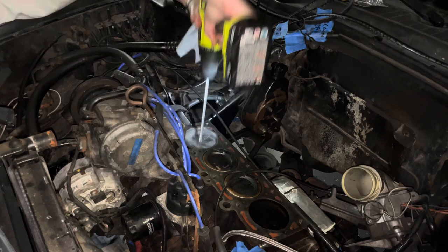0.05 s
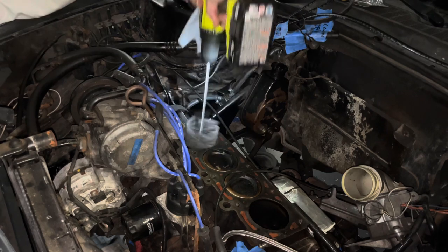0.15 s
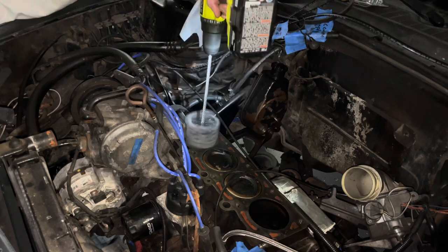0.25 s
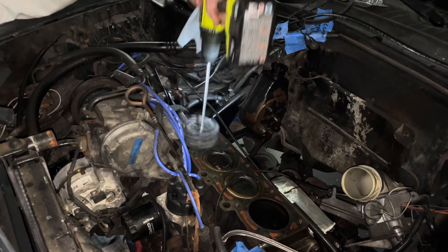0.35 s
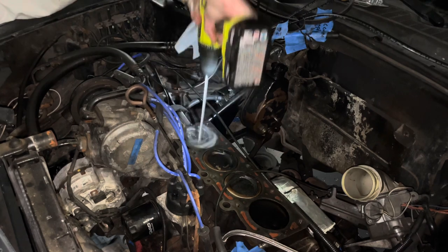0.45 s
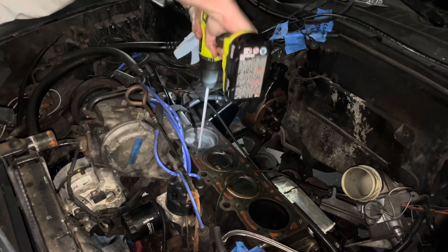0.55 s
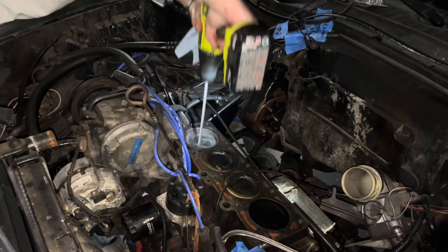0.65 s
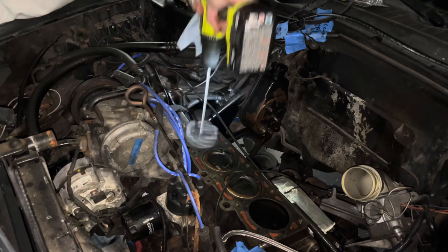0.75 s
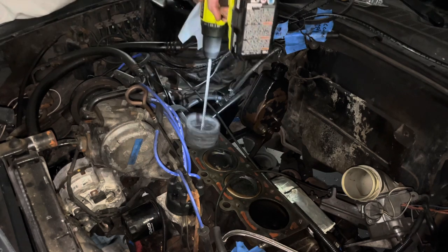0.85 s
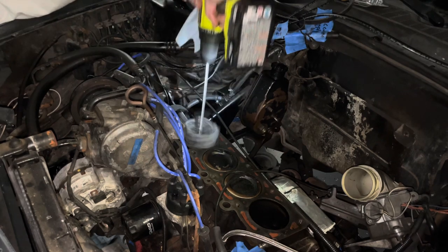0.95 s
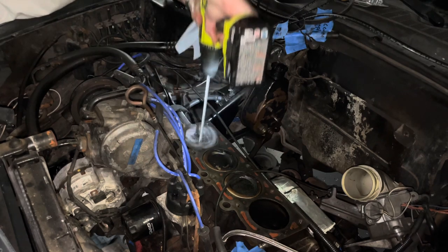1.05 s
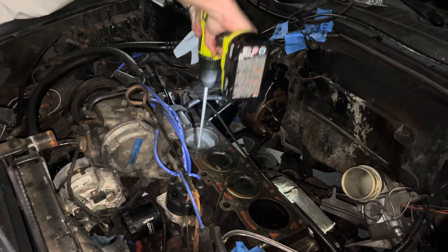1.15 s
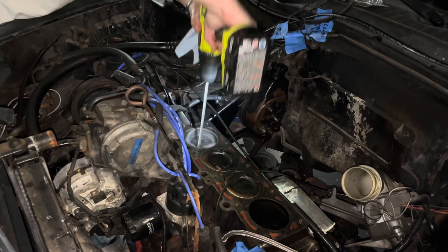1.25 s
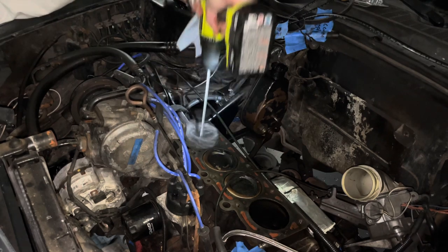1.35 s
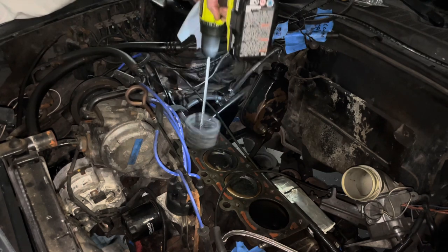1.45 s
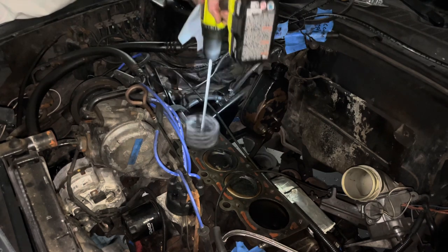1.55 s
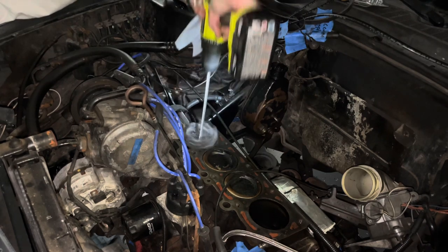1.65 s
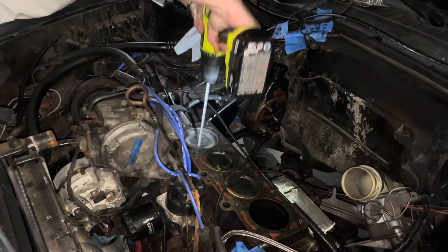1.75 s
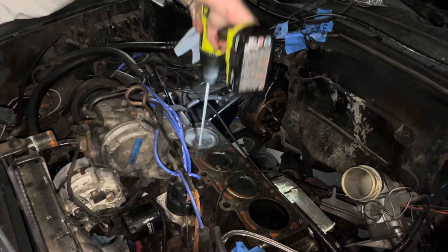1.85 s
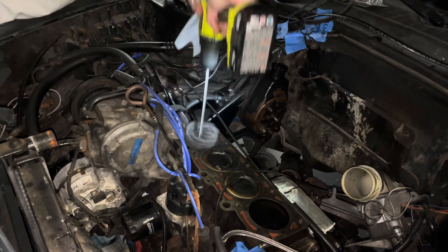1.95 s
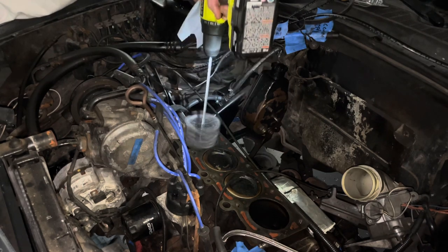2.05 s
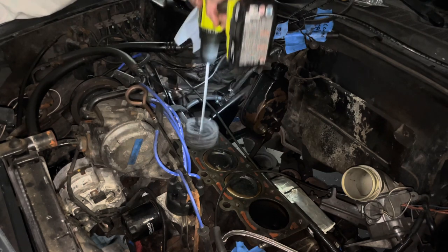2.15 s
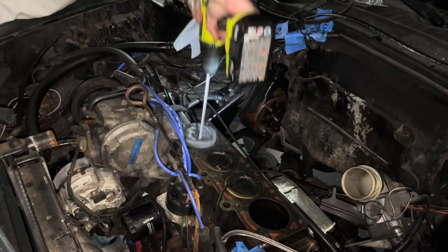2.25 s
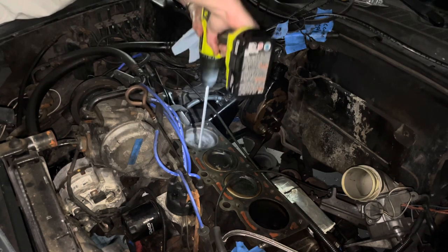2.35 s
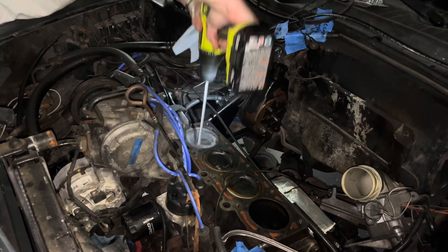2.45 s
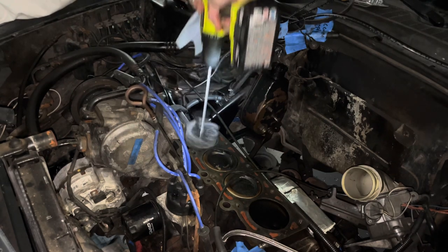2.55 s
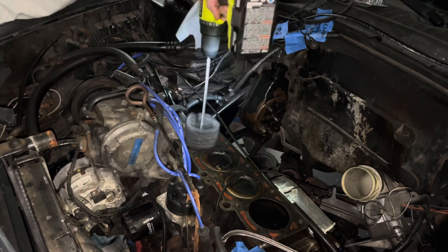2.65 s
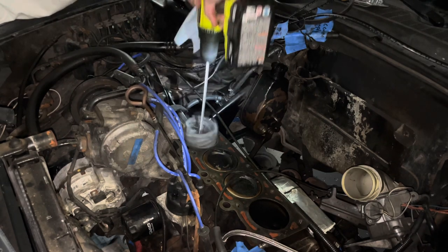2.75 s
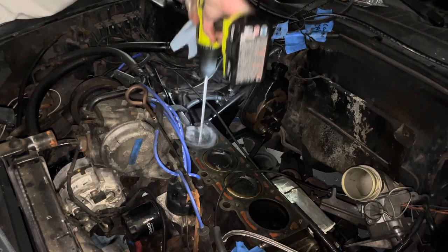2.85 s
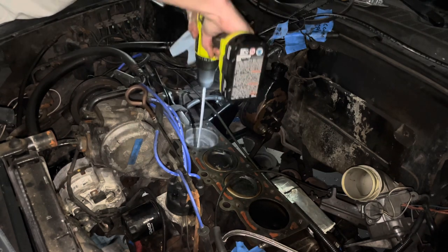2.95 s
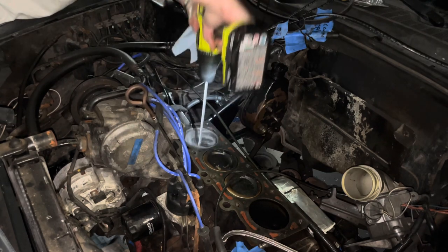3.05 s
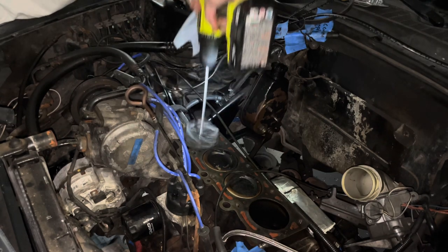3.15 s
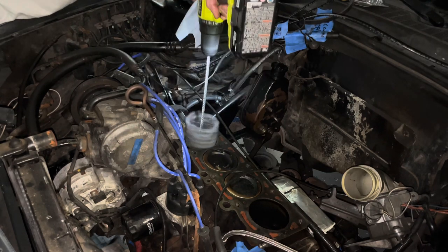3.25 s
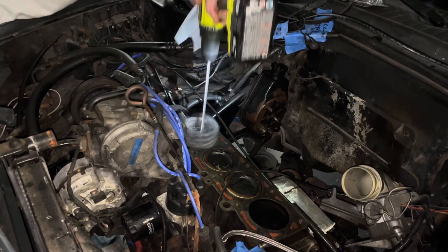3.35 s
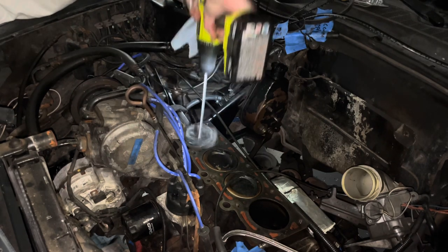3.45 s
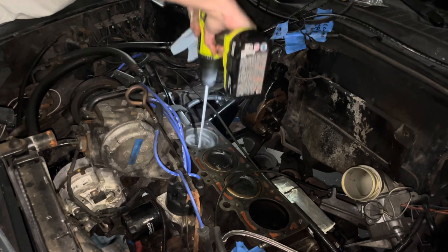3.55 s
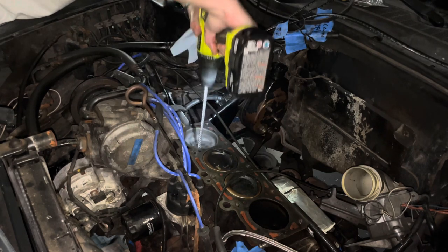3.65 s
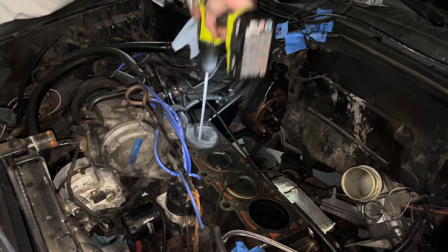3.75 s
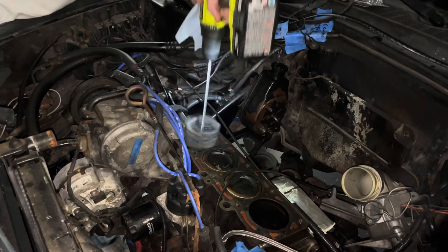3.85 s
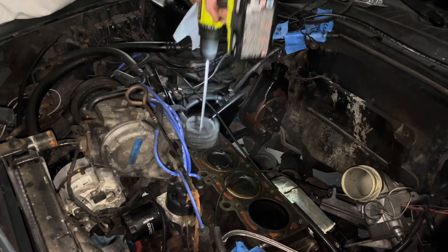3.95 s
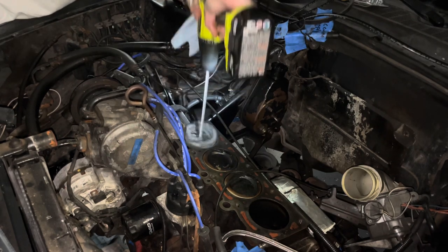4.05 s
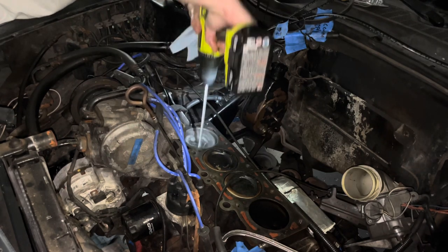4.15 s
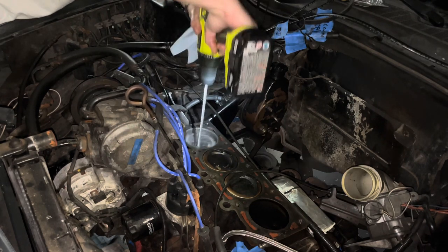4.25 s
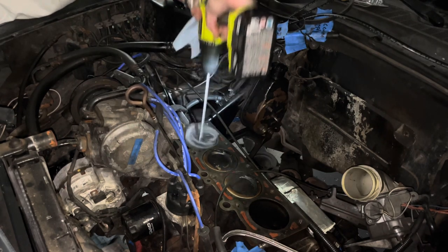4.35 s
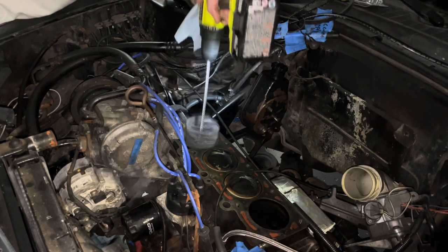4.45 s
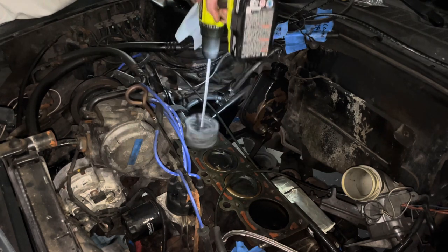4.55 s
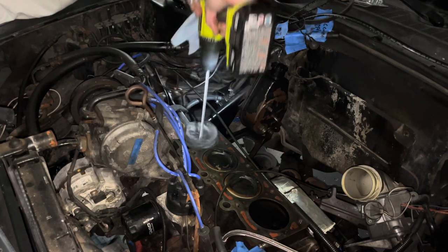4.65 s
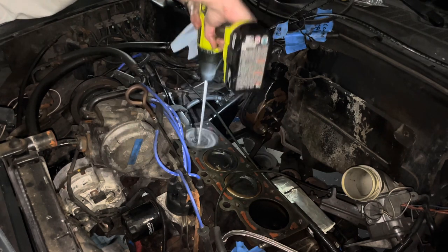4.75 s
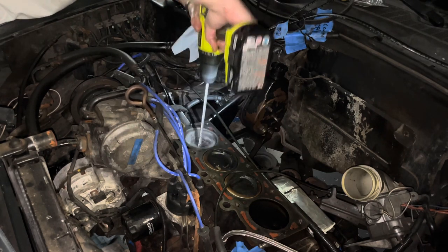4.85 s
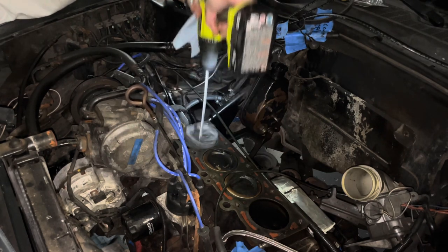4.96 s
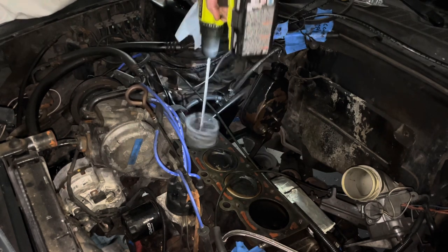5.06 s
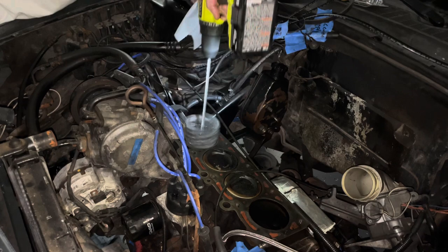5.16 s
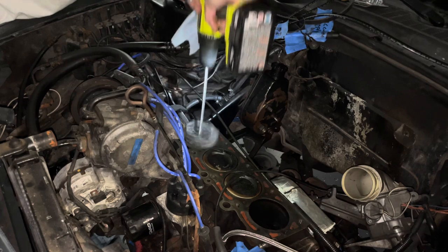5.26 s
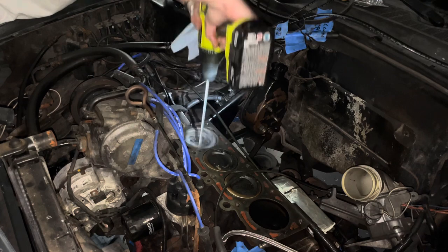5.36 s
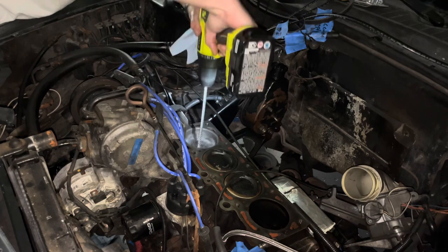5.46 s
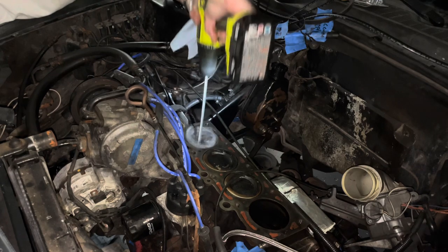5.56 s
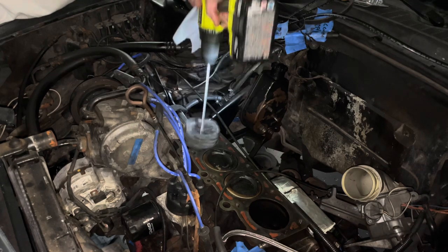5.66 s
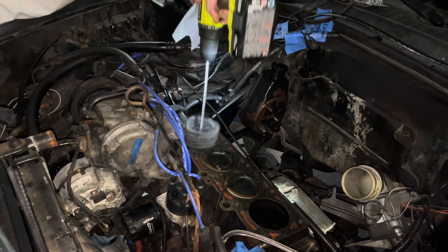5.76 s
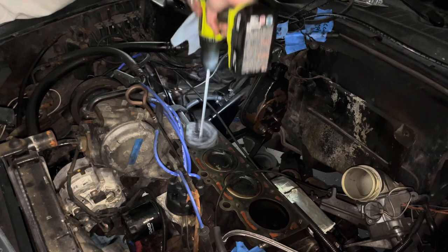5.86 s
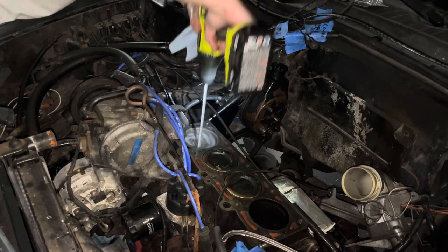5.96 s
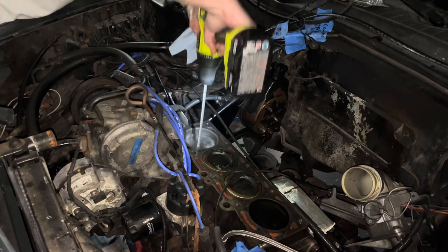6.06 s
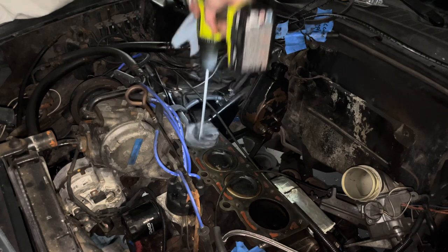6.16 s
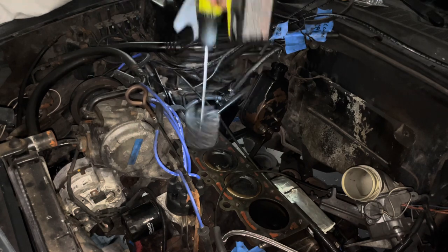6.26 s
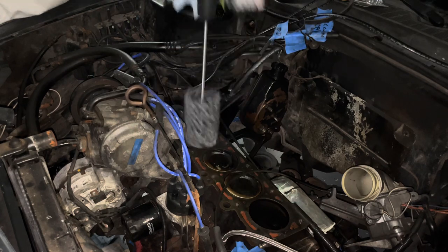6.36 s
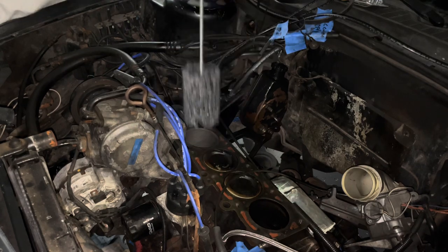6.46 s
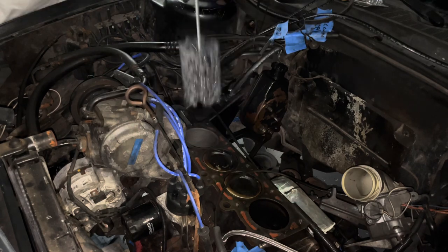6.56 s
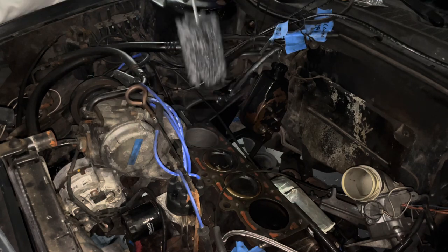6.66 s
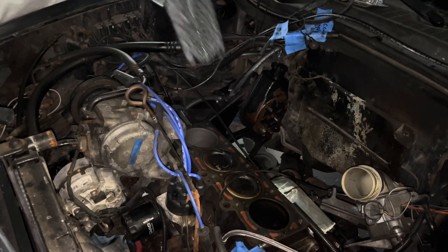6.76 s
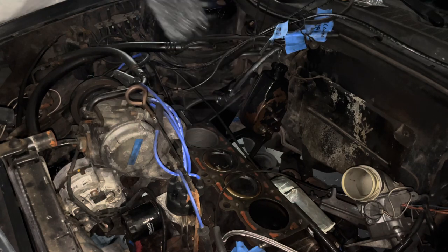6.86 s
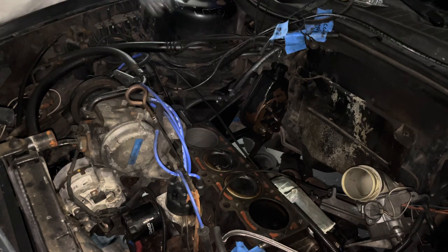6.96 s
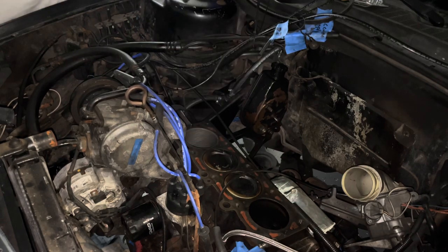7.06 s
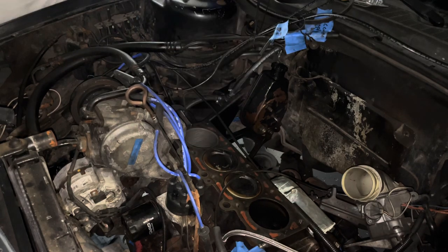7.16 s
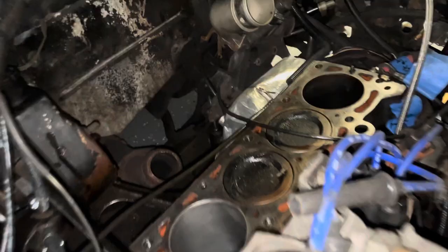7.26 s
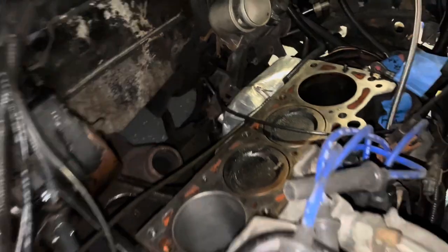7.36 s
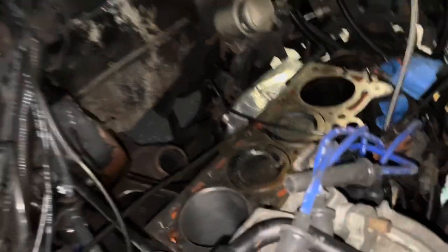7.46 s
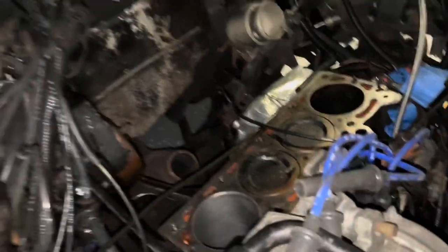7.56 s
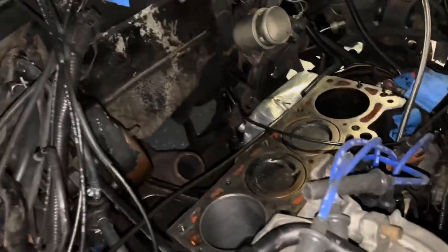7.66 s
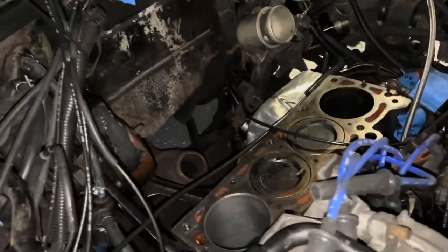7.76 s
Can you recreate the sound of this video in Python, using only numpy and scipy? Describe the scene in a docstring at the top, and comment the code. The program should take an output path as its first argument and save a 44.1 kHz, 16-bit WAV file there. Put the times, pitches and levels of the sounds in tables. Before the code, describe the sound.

Close, wide stereo sound in a garage. Harsh, airy scraping of abrasive on iron dominates, with bright grit hiss above and a high electric drill whine bending up and down on each stroke. Around 6.2 seconds a quick flurry of ticks and knocks marks the hone leaving the bore, and the tool noise cuts off. Then only low hum, room rumble, small hollow knocks and dull thuds, dipping nearly to silence before faint room tone.

```python
"""A cordless drill strokes a ball hone along an engine bore in a garage, then the hone comes out and stops.
Shaped noise, throbbing with the shaft, gives scrape and grit sizzle; sines on shaft multiples give gear whine.
Damped 13 kHz bursts are balls flicking the rim; decaying tones and noise cracks are knocks and thuds.
Behind lie a wavering hum and three bands of room noise; the level dips briefly almost to silence near the end."""
import sys
import numpy as np
from scipy import signal
from scipy.fft import rfft, irfft, next_fast_len
from scipy.io import wavfile
from scipy.ndimage import uniform_filter1d, map_coordinates

SR = 44100
rng = np.random.default_rng(int(sys.argv[2]) if len(sys.argv) > 2 else 0)


def wav_record(signal):
    """Record a signal, one row per channel, as 16-bit PCM in the file named by sys.argv[1]."""
    frames = np.transpose(np.atleast_2d(signal))
    bounded = np.clip(frames, -1, 1)
    # unit amplitude maps onto the largest positive 16-bit level
    quanta = np.round(bounded * 32767).astype(np.int16)
    wavfile.write(sys.argv[1], SR, quanta)


N = 344994

# Room noise, rumble, mid drone and hiss: start_s, rumble_db, drone_db, hiss_db
ROOM_TONE = [(0, -56.5, -57, -71), (3, -54.5, -58, -62), (6.3, -55, -56.5, -69), (6.6, -51.5, -58, -67),
             (6.77, -54, -57.5, -73), (6.9, -54, -56, -67.5), (7.05, -48, -55.5, -70),
             (7.12, -56, -59, -73.5), (7.16, -56, -60, -76), (7.2, -45, -58, -78), (7.27, -52, -60, -77),
             (7.35, -54, -63, -76.5), (7.5, -55.5, -64, -72.5), (7.619, -50.5, -64.5, -79.5),
             (7.75, -52, -60, -70), (7.82, -55, -60, -72)]
# Relative noise spectra of the three bands: frequency_hz, density_db (per Hz)
RUMBLE_SPECTRUM = [(18, -16), (35, -4), (58, -7), (75, 4), (95, 4), (115, 2), (145, -3.5), (185, 0),
                   (230, -7), (300, -18.5)]
DRONE_SPECTRUM = [(200, -16), (280, 1.5), (400, 3.5), (560, -3.5), (700, -3.5), (950, -4.5), (1250, -8),
                  (1600, -18), (2000, -36)]
HISS_SPECTRUM = [(1300, -19.5), (1700, -6), (2300, -12), (3300, -15), (4300, -17), (5900, -19), (7500, -22),
                 (10000, -24), (14500, -19), (15700, -41)]
# Narrow bands that stand out of the hiss: centre_hz, width_hz, rise_db
HISS_RESONANCES = [(5200, 300, 7), (6700, 150, 4), (2350, 150, 3)]
# Hum before its random waver: start_s, level_db
HUM_LEVEL = [(0.0, -41), (0.78, -38.5), (0.92, -43), (1.35, -40.5), (1.44, -45), (1.53, -40), (1.82, -36),
             (1.98, -41), (2.14, -38), (2.35, -39), (2.55, -47), (2.62, -41), (2.89, -39.5), (3.05, -44),
             (3.12, -40), (3.4, -37.5), (3.55, -41.5), (3.97, -39.5), (4.05, -46.5), (4.4, -36),
             (4.61, -40.5), (4.89, -37.5), (5.07, -39.5), (5.15, -46), (5.23, -41), (5.48, -40),
             (5.64, -43.5), (6.01, -37), (6.17, -42), (6.31, -38), (6.39, -41), (6.58, -38), (6.64, -40.5),
             (6.75, -54.5), (6.83, -42.5), (6.95, -38.5), (7.09, -36), (7.25, -40.5), (7.28, -37),
             (7.31, -50.5), (7.44, -47), (7.69, -53), (7.77, -63), (7.8, -58)]
# Dull low bumps after the drill stops: start_s, level_db, pitch_hz
THUDS = [(6.588, -46, 91.5), (6.891, -40, 102), (6.996, -41, 109), (7.118, -34, 99.6), (7.536, -53, 110),
         (7.662, -51, 96.7)]
# Light knocks as the hone slips out and later: start_s, ring_db, crack_db (before mode and filter gains)
KNOCKS = [(6.144, -40, -50), (6.203, -38, -46), (6.255, -38, -50), (6.275, -38, -48), (6.314, -43, -48),
          (6.349, -41, -42), (6.385, -47, -52), (6.471, -49, -62), (6.837, -45, -62), (6.858, -50, -50),
          (6.875, -49, -62), (6.894, -50, -62), (6.945, -46.5, -59), (7.001, -46, -62), (7.049, -47, -63),
          (7.098, -48.5, -65), (7.186, -52, -66)]
# Damped modes of a knock: pitch_hz, relative_db, t60_s
KNOCK_MODES = [(560, 2.5, 0.063), (885, -6, 0.066)]
# Balls flicking the rim, mostly as the hone leaves: start_s, envelope_peak_db
RIM_FLICKS = [(0.0912, -21), (0.3581, -17), (1.3389, -18), (2.8853, -19), (6.158, -20), (6.1985, -17),
              (6.2195, -14), (6.227, -15), (6.2455, -16), (6.2955, -19), (6.3058, -19), (6.3078, -12),
              (6.3425, -19), (6.3615, -16), (6.365, -15), (6.3775, -15), (6.385, -19)]
# Hone on iron, before flares and random swells: start_s, scrape_db, sizzle_db
HONE_LEVEL = [(0.0, -31, -37), (1.5, -31, -35.5), (3.0, -30.5, -35.5), (4.0, -30.5, -35.5),
              (5.0, -30.5, -35.5), (6.13, -30.5, -35.5), (6.226, -29, -28), (6.29, -30.5, -35),
              (6.388, -33.5, -27), (6.43, -34, -36)]
# Relative scrape spectra, mid and side: frequency_hz, density_db (per Hz)
SCRAPE_MID = [(130, -35.5), (220, -19.5), (319, -21), (521, -10), (633, -13), (918, -5.5), (1100, -6),
              (1240, -10), (1380, -7), (1520, -6.5), (1660, -9.5), (2310, -5.5), (3770, -0.5), (4700, -2.5),
              (5200, -5), (6000, -7), (7260, -7), (7700, -15.5), (10000, -88.5), (16900, -120)]
SCRAPE_SIDE = [(130, -59), (220, -23), (360, -29.5), (422, -20.5), (488, -15), (936, -7), (1250, -12.5),
               (1770, -10.5), (3700, 1.5), (4800, -4.5), (7000, -5.5), (9100, -37.5), (15400, -120)]
# Relative grit spectra, mid and side; the side is stronger around 8-9.5 kHz: frequency_hz, density_db (per Hz)
SIZZLE_MID = [(8900, -28.5), (9700, -3), (10500, -2.5), (12500, -2), (13400, 0), (14500, -1.5), (15700, -8)]
SIZZLE_SIDE = [(6600, -22.5), (7400, -4.5), (9500, -5), (11600, -12.5), (11900, -16), (12500, -21)]
# Resonances of the air and iron of the bore: centre_hz, width_hz, rise_db
BORE_RESONANCES = [(960, 220, 1), (1593, 430, 2), (3860, 410, -0.5)]
# Brief flares of the sizzle: centre_s, rise_db
SIZZLE_FLARES = [(0.05, 3), (0.37, 2.5), (0.71, 3), (1.34, 2.5), (3.18, 2), (3.74, 2), (4.4, 2.5),
                 (6.1, 0.5)]
# Gear mesh pitch; the motor slows under load, overshoots and sags each stroke: start_s, pitch_hz
MESH_PITCH = [(0.0, 1858), (0.06, 1851), (0.11, 1877), (0.24, 1991), (0.27, 2008), (0.32, 1974),
              (0.38, 1945), (0.45, 1927), (0.52, 1911), (0.56, 1875), (0.61, 1850), (0.69, 1835),
              (0.75, 1879), (0.8, 1942), (0.83, 1954), (0.89, 1957), (1.06, 1928), (1.11, 1932),
              (1.19, 1892), (1.3, 1861), (1.34, 1870), (1.47, 1972), (1.52, 1992), (1.55, 1985),
              (1.66, 1925), (1.77, 1926), (1.83, 1873), (1.9, 1858), (1.95, 1886), (2.06, 1986),
              (2.12, 1993), (2.22, 1927), (2.37, 1930), (2.4, 1912), (2.45, 1876), (2.51, 1858),
              (2.55, 1869), (2.62, 1945), (2.67, 1943), (2.72, 1963), (2.82, 1958), (3.1, 1858),
              (3.13, 1855), (3.19, 1880), (3.26, 1946), (3.33, 1993), (3.5, 1910), (3.58, 1914),
              (3.62, 1874), (3.71, 1841), (3.77, 1846), (3.81, 1886), (3.87, 1948), (3.93, 1957),
              (4.11, 1932), (4.17, 1938), (4.25, 1880), (4.34, 1873), (4.41, 1882), (4.51, 1959),
              (4.57, 1967), (4.61, 1975), (4.65, 1965), (4.73, 1924), (4.85, 1903), (4.97, 1866),
              (4.99, 1856), (5.11, 1967), (5.15, 1986), (5.25, 1947), (5.31, 1920), (5.41, 1925),
              (5.47, 1882), (5.54, 1862), (5.59, 1867), (5.62, 1870), (5.65, 1911), (5.72, 1943),
              (5.96, 1931), (5.99, 1920), (6.05, 1878), (6.17, 1863), (6.19, 1860), (6.27, 1945),
              (6.36, 1938)]
# Main gear tones before random swells (mesh, octave, one shaft multiple below it, low motor tone):
# start_s, level_db
MESH_LEVEL = [(0.0, -38.5), (0.03, -39.5), (0.2, -37), (0.31, -51), (0.35, -38.5), (0.44, -52.5),
              (0.48, -37.5), (0.51, -52.5), (0.56, -36), (0.68, -46.5), (0.85, -36), (0.98, -39),
              (1.08, -58.5), (1.12, -56.5), (1.15, -40.5), (1.2, -33.5), (1.3, -42), (1.36, -34.5),
              (1.41, -44), (1.45, -36.0), (1.55, -52.5), (1.58, -38.5), (1.62, -37.5), (1.66, -57.5),
              (1.76, -49.5), (1.81, -37.5), (1.89, -43.5), (1.92, -40), (2.04, -36), (2.12, -51.5),
              (2.18, -36.5), (2.28, -58), (2.3, -49), (2.37, -48.5), (2.43, -33.5), (2.53, -50.0),
              (2.57, -33.5), (2.62, -41.5), (2.69, -33.5), (2.83, -40), (2.86, -42), (2.88, -57),
              (2.92, -54), (2.97, -35.5), (3.09, -42.5), (3.2, -35), (3.25, -42.5), (3.3, -38), (3.33, -46),
              (3.42, -36.5), (3.46, -54.5), (3.49, -42.5), (3.6, -36.5), (3.73, -48.5), (3.8, -39.5),
              (4.01, -35.5), (4.13, -52.5), (4.23, -35.5), (4.41, -35), (4.69, -41), (4.73, -43),
              (4.88, -36.0), (4.97, -41), (5.03, -34), (5.07, -40.5), (5.21, -38), (5.26, -39.5),
              (5.3, -54), (5.35, -39.5), (5.4, -47), (5.46, -32.5), (5.55, -45.5), (5.65, -36), (5.97, -47),
              (6.03, -34), (6.16, -43), (6.22, -38.5), (6.27, -43), (6.31, -56.0), (6.36, -55)]
OCTAVE_LEVEL = [(0.0, -33.5), (0.06, -50), (0.11, -43), (0.33, -41.0), (0.36, -53), (0.39, -38),
                (0.52, -31), (0.59, -38), (0.61, -54), (0.64, -42), (0.72, -53), (0.83, -36.5),
                (0.87, -52.5), (0.92, -42), (0.98, -53), (1.01, -35.5), (1.23, -31.5), (1.42, -49.5),
                (1.45, -42), (1.48, -53.5), (1.53, -36), (1.68, -42), (1.73, -32), (1.8, -32),
                (1.89, -52.0), (1.95, -38.5), (2.05, -52), (2.12, -41), (2.26, -47), (2.39, -29.5),
                (2.52, -51.5), (2.55, -43.5), (2.67, -38.5), (2.79, -52.0), (2.82, -40.5), (2.97, -33),
                (3.15, -47.5), (3.18, -36.0), (3.25, -53.5), (3.34, -41.5), (3.38, -50.5), (3.4, -40),
                (3.43, -47.5), (3.53, -29.5), (3.62, -45.5), (3.79, -49.5), (3.82, -38), (3.87, -50.5),
                (3.95, -35), (4.03, -52.0), (4.08, -35.5), (4.2, -29.5), (4.24, -40.5), (4.39, -35),
                (4.44, -52.5), (4.52, -42), (4.58, -44), (4.86, -27.5), (4.98, -48), (5.01, -37.0),
                (5.22, -54), (5.37, -31.5), (5.54, -42), (5.56, -36), (5.62, -38.5), (5.71, -46),
                (5.97, -32), (6.08, -44), (6.19, -39), (6.36, -58)]
BELOW_OCTAVE_LEVEL = [(0.0, -33.5), (0.03, -52), (0.08, -51), (0.11, -34), (0.16, -53.5), (0.27, -45.5),
                      (0.32, -51), (0.37, -37.5), (0.5, -45.5), (0.6, -34), (0.71, -48), (0.81, -40.5),
                      (0.86, -48.5), (0.97, -34.5), (1.3, -45.5), (1.34, -35.5), (1.42, -53.5), (1.52, -46),
                      (1.56, -51.5), (1.62, -39.5), (1.85, -37), (1.91, -49.5), (1.98, -42.5),
                      (2.01, -53.5), (2.1, -38), (2.14, -51.5), (2.19, -44), (2.4, -39), (2.6, -40.5),
                      (2.65, -52.5), (2.67, -39), (2.86, -34), (2.96, -39.5), (2.98, -53), (3.05, -34),
                      (3.15, -51.5), (3.28, -44), (3.36, -52.0), (3.39, -33.5), (3.56, -42), (3.66, -33),
                      (3.76, -42), (3.79, -51), (3.9, -39), (3.98, -48), (4.02, -33), (4.29, -50.5),
                      (4.33, -44), (4.42, -51), (4.45, -36), (4.5, -51), (4.53, -38.5), (4.57, -52),
                      (4.67, -33.5), (4.76, -51.5), (4.8, -37), (4.92, -52.5), (5.06, -44.5), (5.16, -51.5),
                      (5.26, -37.5), (5.4, -44), (5.45, -46), (5.52, -35.5), (5.76, -54), (5.92, -40.5),
                      (6.03, -51), (6.11, -46.5), (6.16, -52.0), (6.19, -47), (6.36, -57)]
LOW_MOTOR_LEVEL = [(0, -53), (0.3, -60.5), (0.45, -47), (0.8, -50), (1.0, -51.5), (1.35, -59), (1.7, -50.5),
                   (2.0, -49.5), (2.1, -63.5), (2.25, -52), (2.5, -56.5), (2.7, -50.5), (3.15, -51.5),
                   (3.35, -63), (3.5, -46), (3.85, -50), (4.1, -47), (4.4, -52.5), (4.85, -48.5),
                   (5.15, -55), (5.35, -50), (5.55, -59), (5.75, -49), (6.0, -50), (6.35, -60)]
# Side minus mid of those four tones, in that order: side_db
MAIN_SIDE_DB = [-14, -1, -1, -5]
# Other whine lines, before random swells: shaft_multiple, level_db, side_minus_mid_db
WHINE_LINES = [(1, -67, -6), (4.05, -64, -1), (4.83, -60, -5), (5.18, -57, -6), (6.45, -59, -10),
               (8.35, -61, -3), (8.6, -59, -10), (8.84, -60, -6), (10.79, -58, -6), (12.65, -59, -5),
               (12.9, -58, -8), (14.01, -58, -6), (14.55, -58, -10), (15.09, -57, -5), (16.16, -53, -1),
               (19.82, -54, -2), (23.14, -55, -2), (24.32, -54, -6), (25.78, -55, -4), (26.07, -57, -7),
               (31, -59, 2), (32, -54, -1), (33.06, -58, 0), (37.7, -62, -1), (42.92, -56, 5)]
# Final filter curves, mid and side: frequency_hz, gain_db
MID_FILTER = [(1, 0), (8100, 0), (8300, -50), (8900, -50), (9050, 0), (23000, 0)]
SIDE_FILTER = [(1, 0), (12350, 0), (12450, -30), (13700, -40), (14000, -70), (23000, -70)]
# Overall gain with its brief dip: start_s, gain (linear)
FADE = [(0, 1), (7.275, 1), (7.3, 0.027), (7.306, 0.035), (7.36, 1)]

HUM_HZ, LATE_HUM_HZ, LATE_S = 58.55, 57.4, 7.3  # the hum is lower after LATE_S
THUD_T60_S = 0.11
SHARED = .62  # likeness of mid and side, a quarter cycle apart
FLARE_WIDE_S, FLARE_SCRAPE = 0.021, 0.13  # bell spread; share of the rise that the scrape follows
TEETH, LOW_MULTIPLE = 11, 5.38  # multiples of the shaft rate
TOP_HZ = 15750


def undb(db):
    """A level of 20 dB is a tenfold amplitude ratio."""
    return np.exp(np.asarray(db) * (np.log(10) / 20))


def level(x, db):
    """Scaling by the standard deviation sets the effective level."""
    return x * (undb(db) / x.std())


def curves(table):
    """Linear interpolation carries each column of a table to every sample."""
    s, *columns = np.transpose(table)
    return [np.interp(np.arange(N) / SR, s, c) for c in columns]


def colour(x, points, peaks=(), outside_db=-70):
    """Linear filtering multiplies the spectrum by a gain curve with resonances on top."""
    size = next_fast_len(N)
    hz = np.arange(size // 2 + 1) * SR / size + 1  # +1 keeps the logarithm finite
    at, db = np.transpose(points)
    gain_db = np.interp(np.log(hz), np.log(at), db, left=outside_db, right=outside_db)
    for centre, width, peak_db in peaks:
        gain_db += peak_db / (1 + (2 * (hz - centre) / width) ** 2)
    return irfft(rfft(x, size) * undb(gain_db), size)[:N]


def walk(rate):
    """Random modulation: levels drawn at a rate per second, joined by straight slews; spread near 1."""
    levels = rng.standard_normal(int(N * rate / SR) + 2)
    return 1.22 * np.interp(np.arange(N), np.arange(len(levels)) * SR / rate, levels)


def bumps(times, wide_s, rise_db):
    """Superposition of bell-shaped swells in dB."""
    t = np.arange(0, N, 64) / SR
    total = np.exp(-.5 * ((t[:, None] - times) / wide_s) ** 2) @ (rise_db * np.ones(len(times)))
    return np.interp(np.arange(N) / SR, t, total)


def patchy(x, depth_db, width_hz, last_s):
    """Local modulation: small regions of time and frequency swell and fade at random."""
    _, _, z = signal.stft(x, nperseg=1024)
    rows_per_cell = max(width_hz * 1024 / SR, 1)
    columns_per_cell = max(last_s * SR / 512, 1)
    rows, columns = np.indices(z.shape)
    field = rng.standard_normal((520, N // 500))
    gain_db = map_coordinates(field, [rows / rows_per_cell, columns / columns_per_cell], order=1)
    return signal.istft(z * undb(depth_db * gain_db / gain_db.std()), nperseg=1024)[1][:N]


def quarter(x):
    """Phase quadrature: every component a quarter cycle early."""
    size = next_fast_len(N)
    return irfft(1j * rfft(x, size), size)[:N]


def room(x, t60, wet_db):
    """Reverberation: direct sound plus an exponentially decaying diffuse tail, with total power kept."""
    t = np.arange(SR * 3 // 4) / SR
    tail = rng.standard_normal(len(t)) * np.exp(-np.log(1000) * t / t60) * (t > .004)
    tail *= undb(wet_db) / np.sqrt(np.sum(tail ** 2))
    tail[0] = 1  # direct sound
    return signal.fftconvolve(x, tail)[:N] / np.sqrt(np.sum(tail ** 2))


def left_right(mid, side):
    """Sum and difference of mid and side give the two channels."""
    return np.array([mid + side, mid - side])


def running(stop_s, fall_s):
    """A linear decay: 1 while the tool works, falling over fall_s to reach 0 at stop_s."""
    return np.clip((stop_s - np.arange(N) / SR) / fall_s, 0, 1)


def decay(t, t60):
    """Exponential damping falls by 60 dB in t60 seconds."""
    return np.exp(-np.log(1000) * t / t60)


def garage():
    """Amplitude-modulated hum with its second harmonic, over filtered noise; the bass leans right."""
    hum_hz = np.where(np.arange(N) < LATE_S * SR, HUM_HZ, LATE_HUM_HZ)
    cycle = 2 * np.pi * np.cumsum(hum_hz) / SR
    hum_db = curves(HUM_LEVEL)[0] + 0.55 * walk(30) + .6 * walk(12)
    hum = np.sqrt(2) * undb(hum_db) * np.sin(cycle)
    hum += undb(-64.0 + 2.8 * walk(2.7)) * np.sin(2 * cycle)
    out = left_right(hum, -.26 * hum)

    def band(spectrum, resonances):
        """Random noise shaped by a spectrum, fluctuating locally and as a whole."""
        noise = patchy(rng.standard_normal(N), 1.2, 500., .06)
        return level(colour(noise, spectrum, resonances), 0) * undb(walk(18))

    rumble_db, drone_db, hiss_db = curves(ROOM_TONE)
    # level, spectrum, resonances, side dB, lean (positive is left)
    bands = [(rumble_db, RUMBLE_SPECTRUM, (), -11, -.26),
             (drone_db, DRONE_SPECTRUM, (), -1.5, -.1),
             (hiss_db, HISS_SPECTRUM, HISS_RESONANCES, -1.2, .1)]
    for db, spectrum, resonances, side_db, lean in bands:
        mid, side = (band(spectrum, resonances) for _ in range(2))
        out += undb(db) * left_right(mid, undb(side_db) * side + lean * mid)
    return out


def thuds():
    """Free decay of a single low mode, leaning right like the rest of the bass."""
    t = np.arange(SR // 5) / SR
    mid = np.zeros(N + len(t))
    for s, db, hz in THUDS:
        start = int(s * SR)
        mid[start:start + len(t)] += undb(db) * np.sin(2 * np.pi * hz * t) * decay(t, THUD_T60_S)
    return left_right(mid[:N], -.3 * mid[:N])


def knocks():
    """Impact excitation: damped modes ring hollow beside a soft crack of band-limited noise."""
    t = np.arange(SR // 6) / SR
    out = np.zeros((2, N))
    edges = signal.butter(2, [1000., 3500.], "band", fs=SR, output="sos")
    ring = sum(undb(db) * np.sin(2 * np.pi * hz * t) * decay(t, t60) for hz, db, t60 in KNOCK_MODES)
    ring *= 1 - np.exp(-t / 0.0021)  # soft onset
    noises = rng.standard_normal((len(KNOCKS), 2, len(t)))
    for (s, ring_db, crack_db), noise in zip(KNOCKS, noises):
        crack = signal.sosfilt(edges, noise) * np.exp(-t / .008)
        start = int(s * SR)
        out[:, start:start + len(t)] += undb(ring_db) * ring + undb(crack_db) * crack
    return out


def flicks():
    """Impulsive release: each ball rings for a few cycles near 13 kHz as it snaps past the rim."""
    t = np.arange(88) / SR
    envelope = t / .00012 * np.exp(1 - t / .00012)
    mid = np.zeros(N)
    draws = rng.uniform(-1, 1, (len(RIM_FLICKS), 2))
    for (s, db), (bend, sign) in zip(RIM_FLICKS, draws):
        ring = envelope * np.sin(2 * np.pi * 12800 * (1 + .06 * bend) * t)
        start = int(s * SR)
        mid[start:start + len(t)] += np.sign(sign) * undb(db) * ring
    return left_right(mid, .3 * quarter(mid))


def strokes():
    """Load sets motor speed: mesh pitch, rounded at its turns, and the levels of the four main tones."""
    mesh_hz = uniform_filter1d(curves(MESH_PITCH)[0], size=SR // 100)
    tables = (MESH_LEVEL, OCTAVE_LEVEL, BELOW_OCTAVE_LEVEL, LOW_MOTOR_LEVEL)
    return mesh_hz, [curves(table)[0] for table in tables]


def gears():
    """Rotation gives lines on the shaft rate; the side hears each a quarter cycle early and fades less."""
    mesh_hz, main_db = strokes()
    turn = 2 * np.pi * np.cumsum(mesh_hz * (1 + .0011 * walk(40))) / SR / TEETH  # shaft angle
    multiples = [TEETH, 2 * TEETH, 2 * TEETH - 1, LOW_MULTIPLE]
    lines = list(zip(multiples, main_db, MAIN_SIDE_DB))
    lines += [(k, db + 3 * walk(12), side_db) for k, db, side_db in WHINE_LINES]
    mid, side = np.zeros(N), np.zeros(N)
    for k, db, side_db in lines:
        mid += undb(db + 1.3 * walk(45)) * np.sin(k * turn)
        steadier_db = .6 * db + .4 * db[:6 * SR].mean()
        side_level = undb(steadier_db + side_db + 2.5 * walk(10))
        side += side_level * np.cos(k * turn + .35 * walk(7))
    on = np.sqrt(2) * running(6.35, .06)
    return left_right(room(on * mid, .5, -25), room(on * side, .5, -13)), turn


def grit(turn, spread_db, throb):
    """Friction noise: dense scratches of uneven size, pressed harder once a shaft turn."""
    unevenness = uniform_filter1d(rng.exponential(size=N), size=5)
    size = undb(spread_db * unevenness + 0.11 * walk(9.9))
    return level(rng.standard_normal(N) * size * (1 + throb * np.sin(turn)), 0)


def hone(turn):
    """Friction excites resonance: balls scrape iron, rung by the bore, with a sizzle of grit above."""
    scrape_db, sizzle_db = curves(HONE_LEVEL)
    flare_s, flare_db = np.transpose(SIZZLE_FLARES)
    flare = bumps(flare_s, FLARE_WIDE_S, flare_db)
    scrape_db = scrape_db + FLARE_SCRAPE * flare
    scrape_db -= 3.3 * (1 - running(6.4, 0.099))  # fewer balls touch the bore as the hone comes out
    sizzle_db = sizzle_db + flare + 0.2 * walk(6.5) + 0.71 * walk(12) + 0.9 * walk(24)
    on = running(6.44, 0.043)
    scrape_gain, sizzle_gain = undb(scrape_db) * on, undb(sizzle_db) * on
    rub, rub_side = (patchy(grit(turn, 2.5, .08), 2.4, 80., .035) for _ in range(2))
    fizz, fizz_side = grit(turn, 3.4, 0.043), grit(turn, 4.0, .05)
    own = np.sqrt(1 - SHARED ** 2)
    rub_side = own * rub_side + SHARED * quarter(rub)
    fizz_side = own * fizz_side + SHARED * quarter(fizz)
    scrape_mid = level(colour(rub, SCRAPE_MID, BORE_RESONANCES), -1.02) * scrape_gain
    scrape_side = level(colour(rub_side, SCRAPE_SIDE, BORE_RESONANCES), -2.5) * scrape_gain
    sizzle_mid = level(colour(fizz, SIZZLE_MID), -0.22) * sizzle_gain
    sizzle_side = level(colour(fizz_side, SIZZLE_SIDE), 2.7) * sizzle_gain
    mid = room(scrape_mid, .6, -9) + room(sizzle_mid, .4, -13)
    side = room(scrape_side, 0.44, -2.5) + room(sizzle_side, .45, -14.0)
    return left_right(mid, side)


def scene():
    """Superposition of all sources; the gears' shaft angle also drives the hone."""
    whine, turn = gears()
    return garage() + thuds() + knocks() + flicks() + whine + hone(turn)


def record(dry):
    """Linear filtering: fixed curves shape mid and side; then a brief level dip and a steep low-pass."""
    mid = colour((dry[0] + dry[1]) / 2, MID_FILTER)
    side = colour((dry[0] - dry[1]) / 2, SIDE_FILTER)
    faded = left_right(mid, side) * curves(FADE)[0]
    steep_top = signal.ellip(10, .2, 80, TOP_HZ, fs=SR, output="sos")
    return signal.sosfilt(steep_top, faded)


dry = scene()
out = record(dry)
wav_record(out)
```